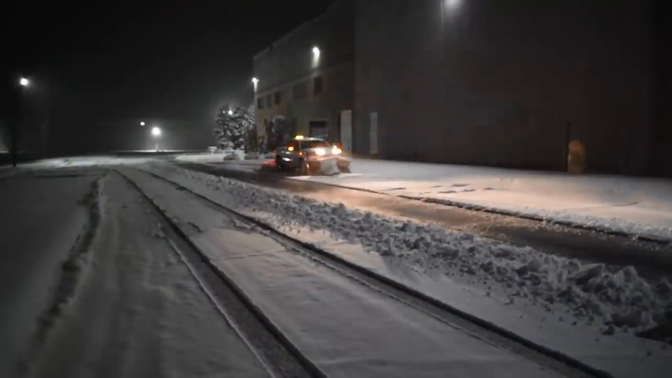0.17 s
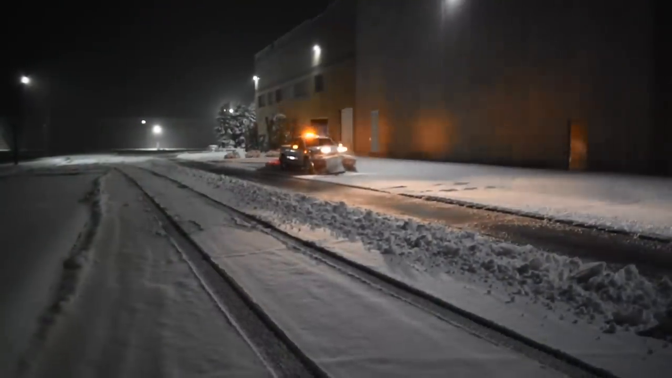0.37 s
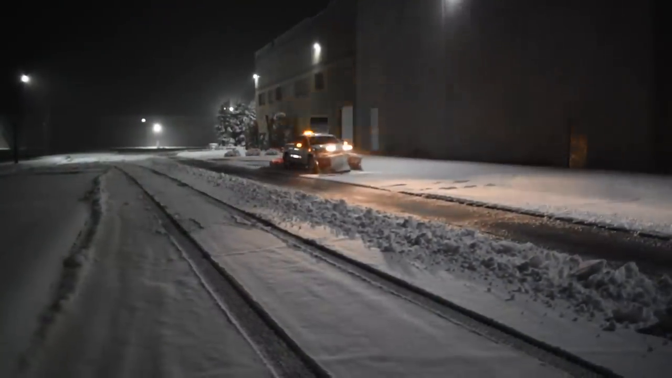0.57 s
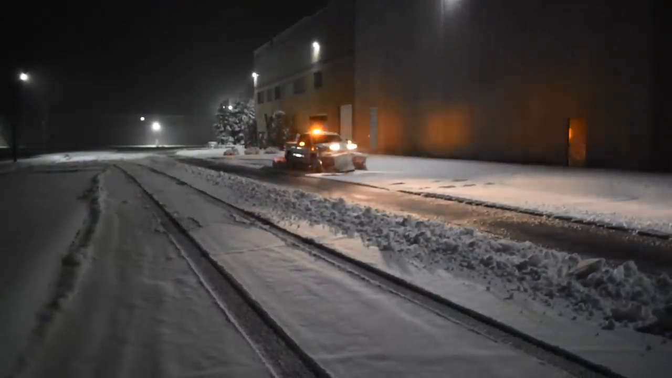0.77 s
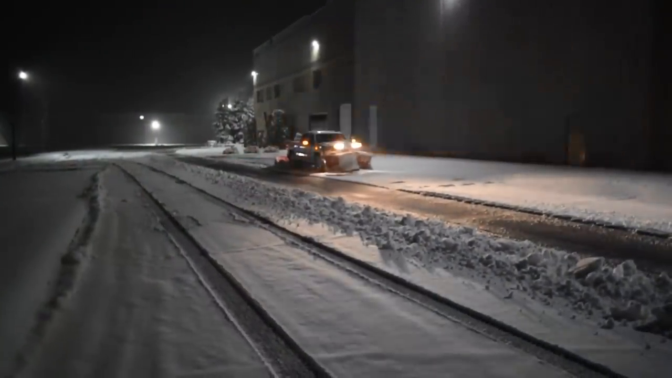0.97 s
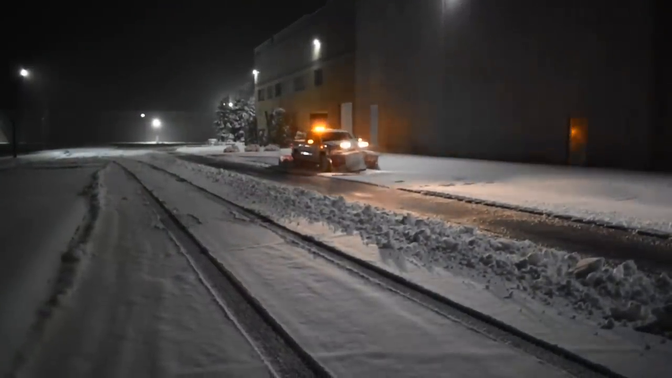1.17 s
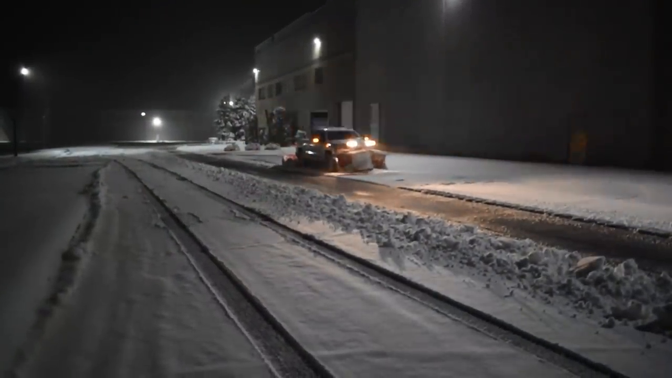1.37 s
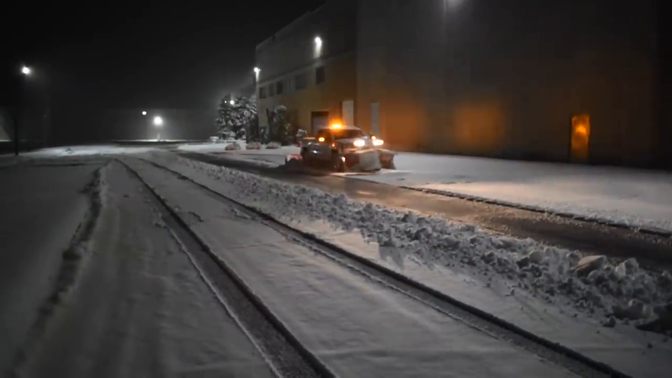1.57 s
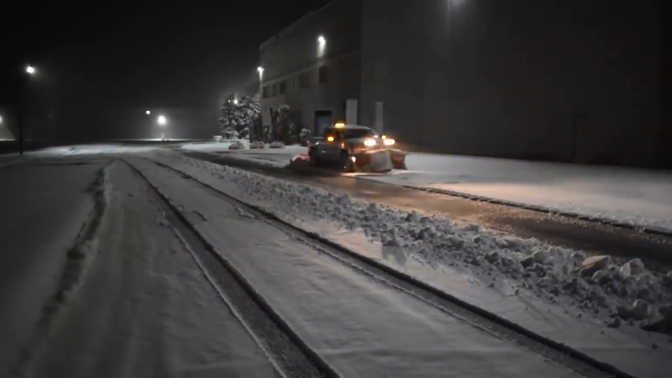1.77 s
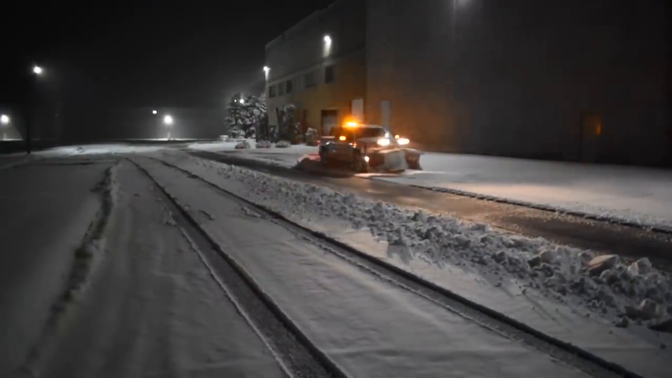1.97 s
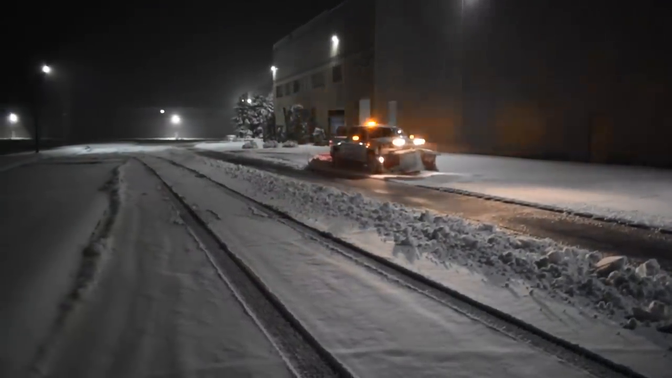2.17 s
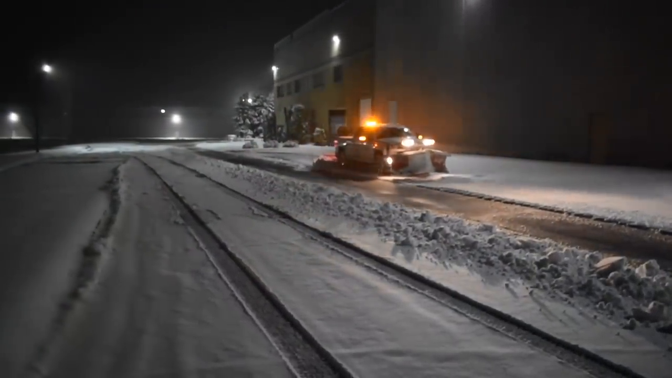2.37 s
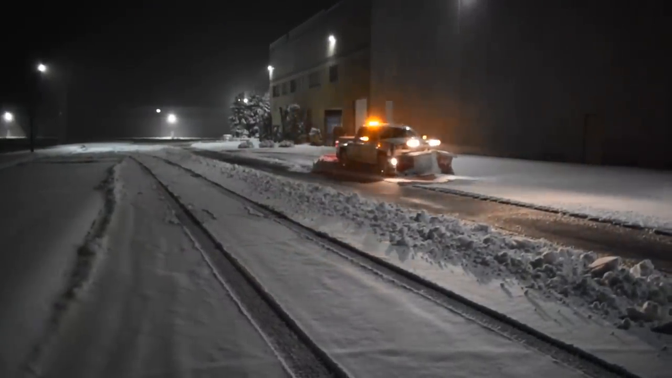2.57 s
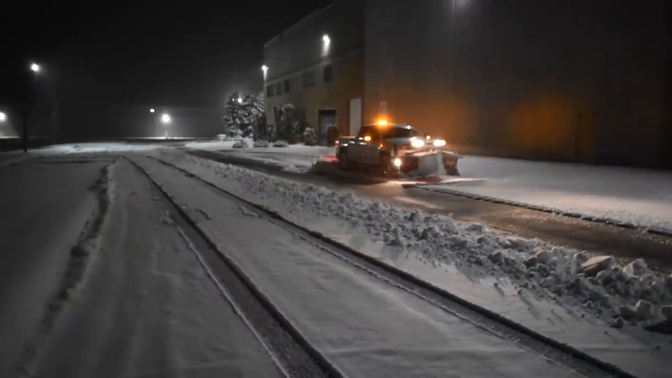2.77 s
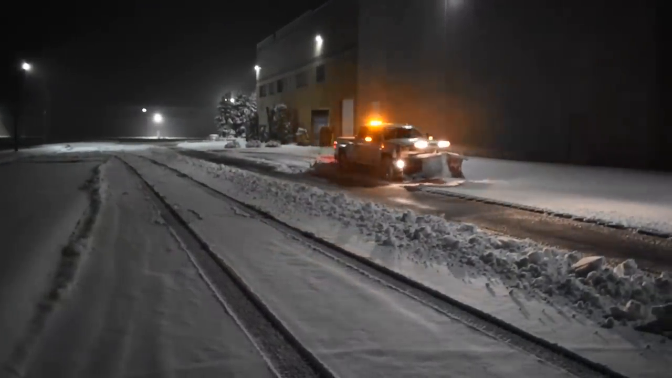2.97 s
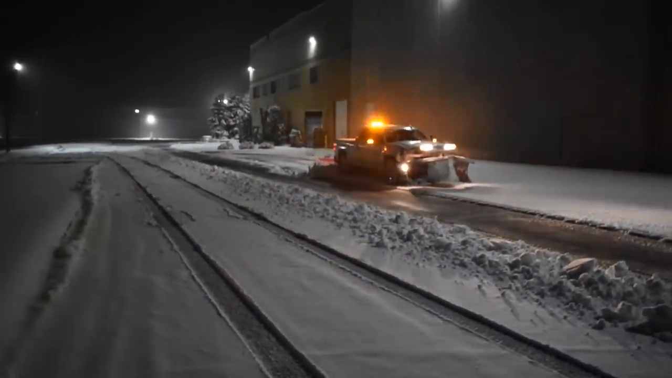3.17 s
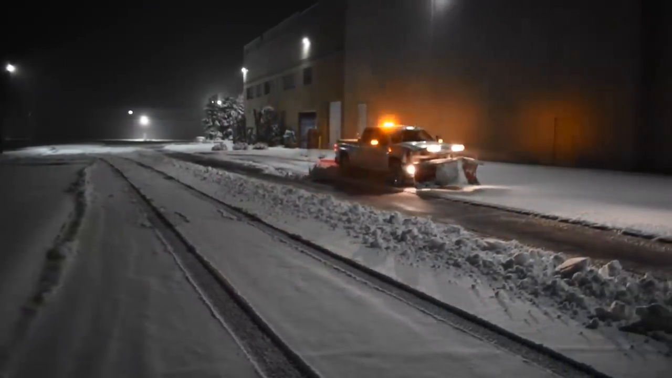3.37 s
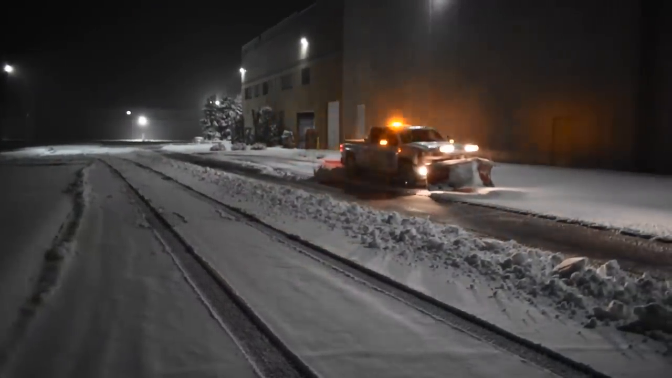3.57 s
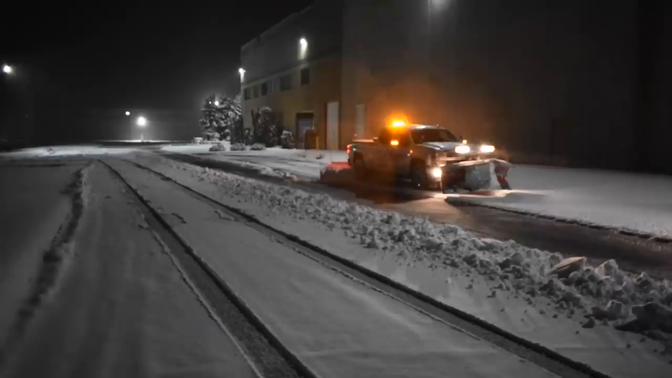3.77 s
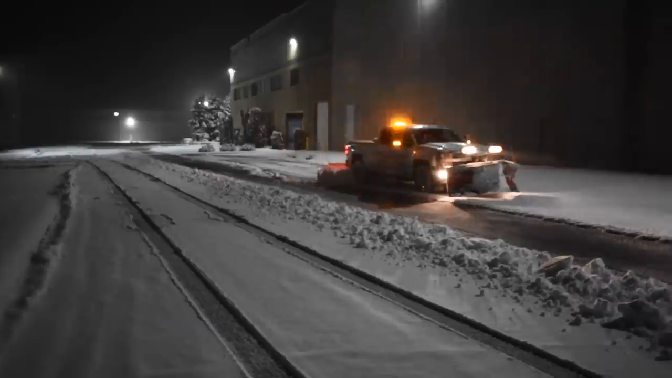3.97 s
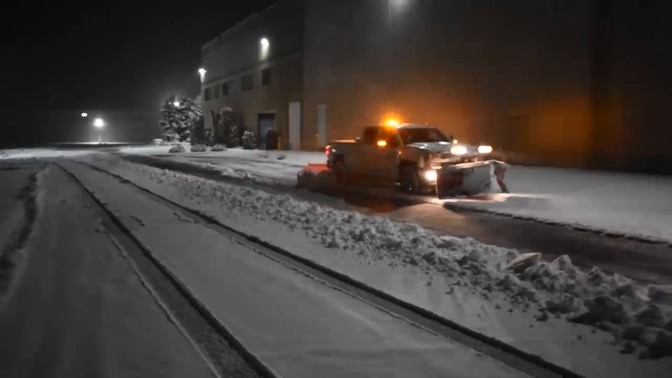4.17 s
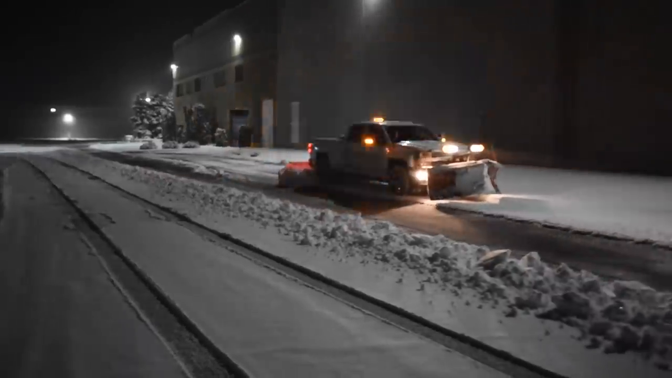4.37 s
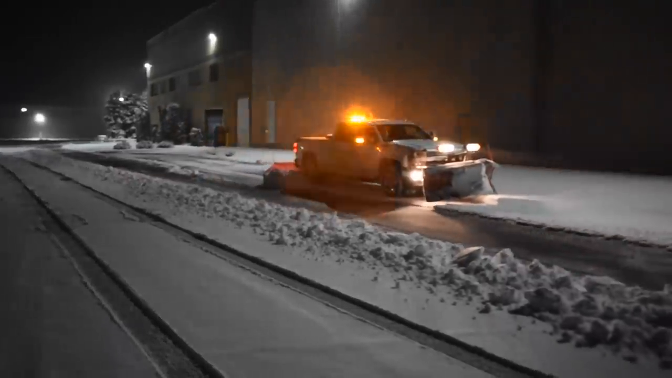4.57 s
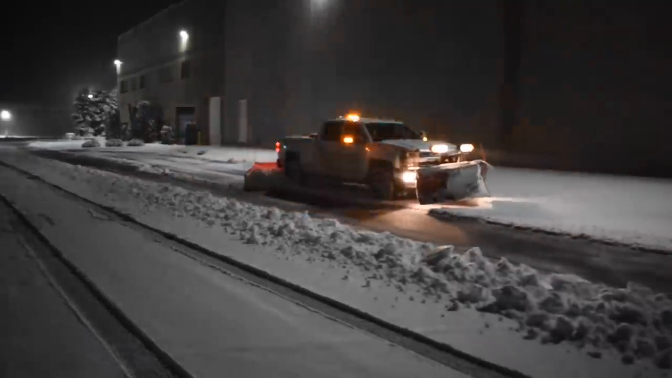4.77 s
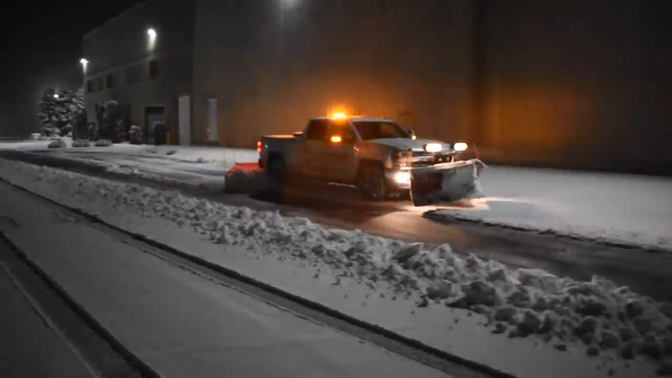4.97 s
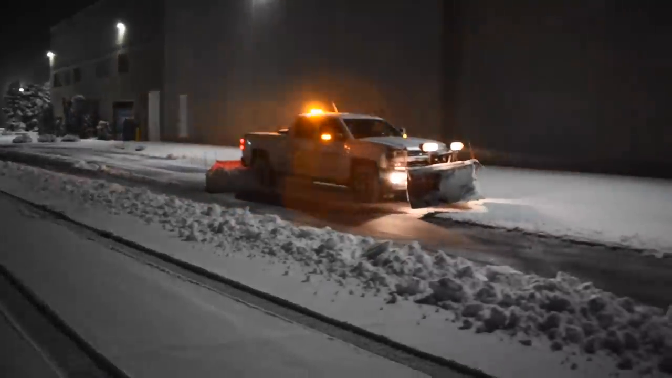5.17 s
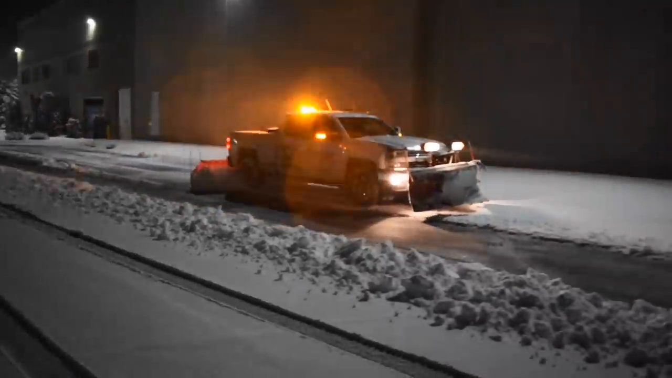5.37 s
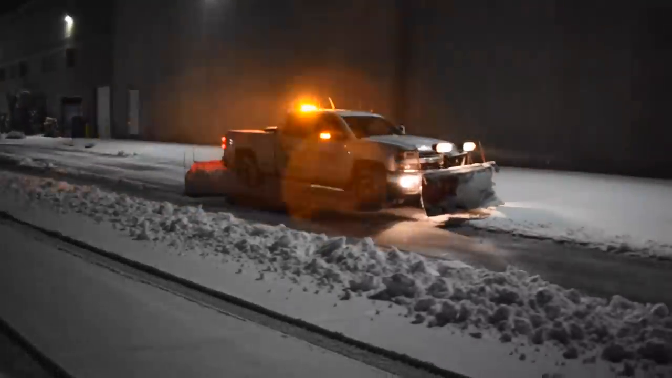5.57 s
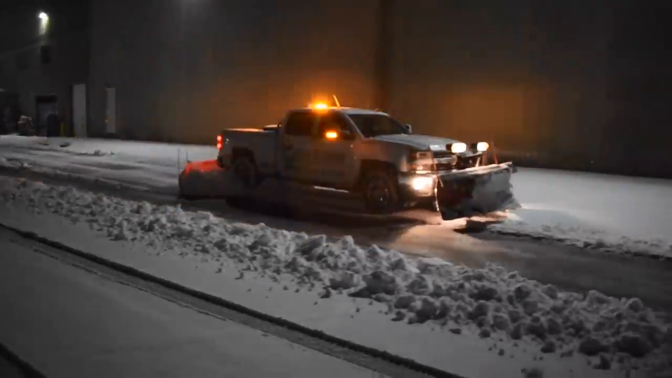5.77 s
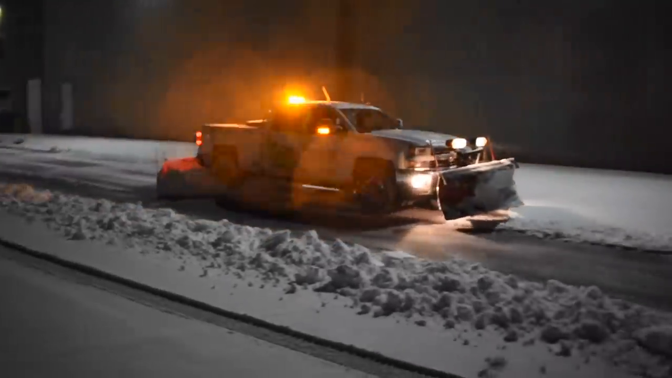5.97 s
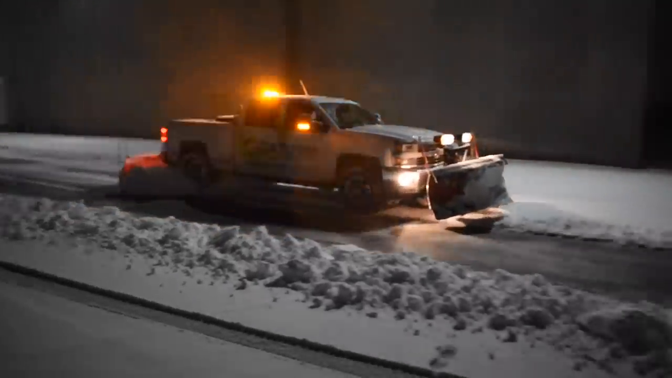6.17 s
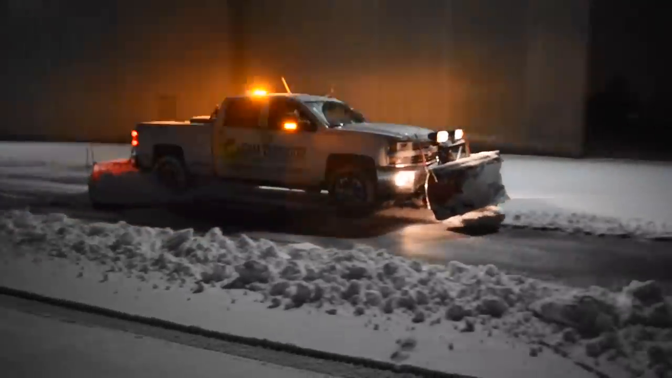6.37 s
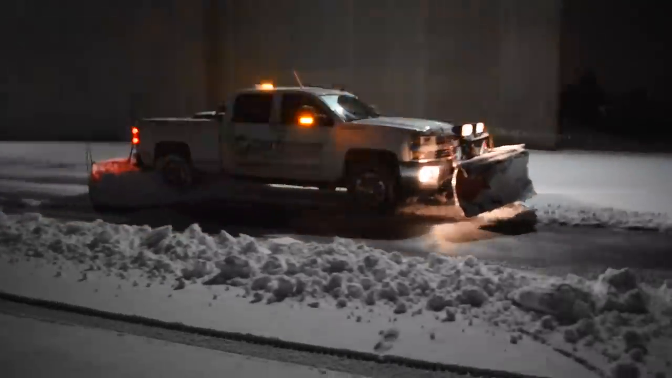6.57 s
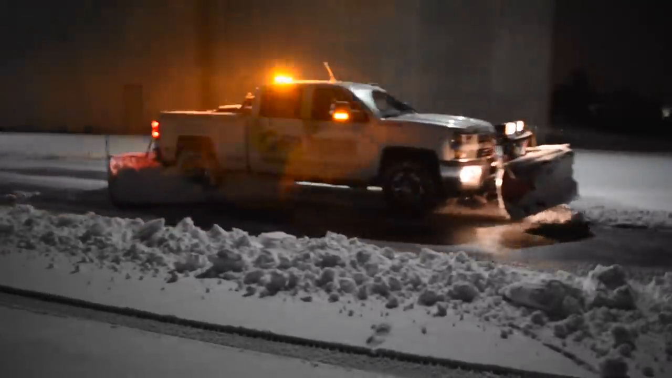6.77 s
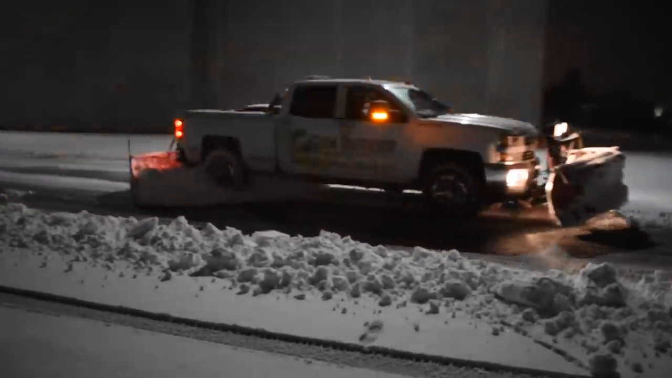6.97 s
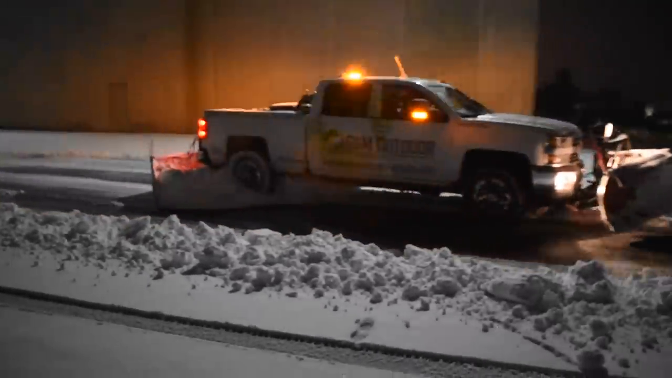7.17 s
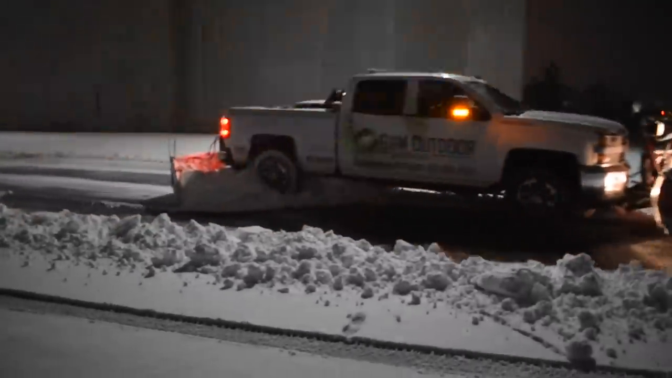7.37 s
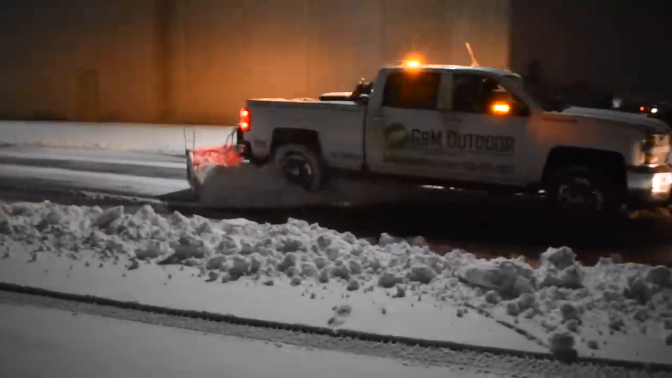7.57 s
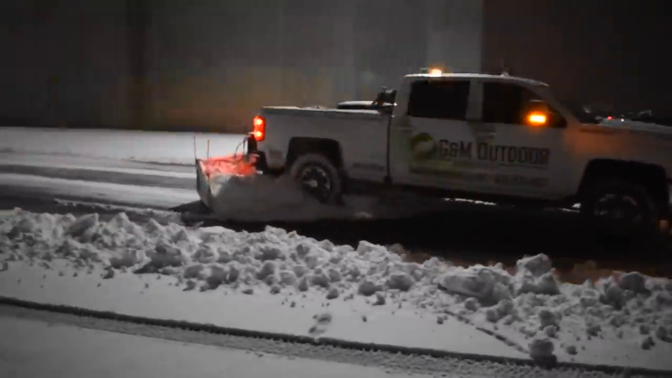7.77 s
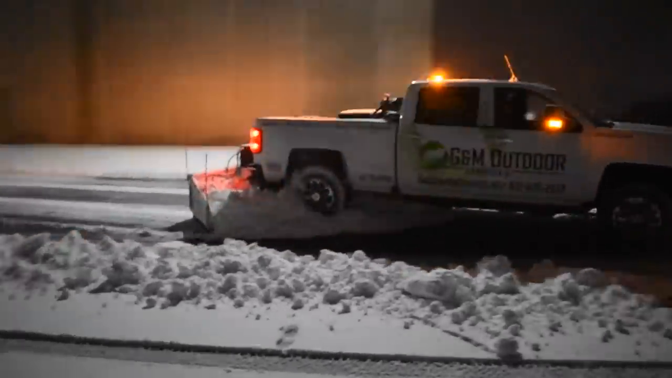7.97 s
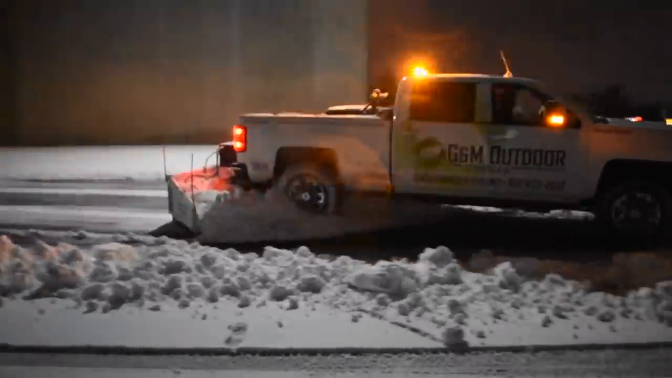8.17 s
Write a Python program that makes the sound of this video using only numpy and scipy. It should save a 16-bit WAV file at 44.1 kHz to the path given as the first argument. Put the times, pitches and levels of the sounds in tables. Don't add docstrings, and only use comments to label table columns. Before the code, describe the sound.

A pickup with a snow plow drones closer over wet asphalt, its blade roaring and hissing, then crunches loudly through packed snow as it passes.

```python
import sys
import numpy as np
from scipy import signal
from scipy.io import wavfile
from scipy.ndimage import uniform_filter1d

SR = 44100
rng = np.random.default_rng(int(sys.argv[2]) if len(sys.argv) > 2 else 0)


def convert_level_to_amplitude(level_db):
    exponent = np.asarray(level_db, float) / 20
    return 10 ** exponent


def wrap_up_sound(samples):
    columns = np.atleast_2d(samples).T
    tamed = np.clip(columns, -1, 1)
    steps = np.round(tamed * 32767).astype(np.int16)
    wavfile.write(sys.argv[1], SR, steps)


N = 362502

# [t/s, firing rate/Hz]
FIRING_RATE = [(0, 99.5), (.3, 101.6), (.8, 99.8), (1.5, 102.6), (1.75, 106.4), (2.25, 109.8), (3.2, 115),
               (4.18, 113.9), (4.45, 99.6), (4.65, 94), (4.75, 93), (4.95, 108.3), (5.1, 113),
               (5.35, 114.5), (6.05, 111.4), (6.8, 108.6), (7.35, 108.3), (8.22, 112.3)]
# [f/Hz, density/dB per Hz]
HISS_SPECTRUM = [(1200, -3), (1600, -3.5), (2200, -3.5), (3000, -6.5), (3800, -9), (4500, -8.5),
                 (5000, -11), (7000, -12.5), (8100, -10), (8800, -23), (10000, -19.5), (11500, -24),
                 (14000, -21.5), (16000, -21)]


def rms_one(x):
    return x / np.sqrt(np.mean(x ** 2) + 1e-20)


def in_time(rows):
    s, *columns = np.transpose(rows)
    return [np.interp(np.arange(N) / SR, s, c) for c in columns]


def at_hz(points, hz):
    f_hz, level_db = np.transpose(points)
    return np.interp(np.log(hz), np.log(f_hz), level_db)


def drift(rate_hz):
    r = np.exp(-2 * np.pi * rate_hz * 40 / SR)
    white = rng.standard_normal(N // 40 + 2002)
    slow = signal.lfilter([1], [1, -2 * r, r * r], white)[2000:]
    return np.interp(np.arange(N) / 40, np.arange(len(slow)), rms_one(slow))


def bell(centre_s, half_s):
    return np.exp(-((np.arange(N) / SR - centre_s) / half_s) ** 2)


def passing(abeam_s, level_db, steepness, afar_db):
    pass_s = 1.104
    nearness = 1 / (1 + ((np.arange(N) / SR - abeam_s) / pass_s) ** 2)
    return 10 * np.log10(convert_level_to_amplitude(level_db) ** 2 * nearness ** steepness + convert_level_to_amplitude(afar_db) ** 2)


def ring(clicks, hz, t60_s):
    r, w = convert_level_to_amplitude(-60 / (t60_s * SR)), 2 * np.pi * hz / SR
    return signal.lfilter([0, np.sin(w)], [1, -2 * r * np.cos(w), r * r], clicks + 1e-18)


def tone(turns, level_db):
    return np.sqrt(2) * convert_level_to_amplitude(level_db) * np.sin(2 * np.pi * (turns + rng.random()))


def noise(spectrum, patchy_db, count):
    edges_hz = np.geomspace(spectrum[0][0], spectrum[-1][0], count + 1)
    white, together, out = rng.standard_normal((2, N)), drift(11), 0
    for k, (low, high) in enumerate(zip(edges_hz, edges_hz[1:])):
        sos = signal.butter(2, [low, high], "band", fs=SR, output="sos")
        band = signal.sosfilt(sos, white[k % 2])
        flicker_db = patchy_db * (0.16 * together + 1.16 * drift(27))
        out = out + band * convert_level_to_amplitude(at_hz(spectrum, np.sqrt(low * high)) + flicker_db)
    return rms_one(out)


def grains(per_s, spread_db, pitches_hz, spectrum, cycles):
    sizes = convert_level_to_amplitude(spread_db * np.minimum(rng.exponential(1, N), 4)) * rng.choice([-1, 1], N)
    born = rng.random(N) < per_s * convert_level_to_amplitude(2.2 * drift(50)) / SR
    dealt = rng.integers(0, len(pitches_hz), N)
    out = 0
    for k, hz in enumerate(pitches_hz):
        clicks = sizes * born * (dealt == k)
        out = out + convert_level_to_amplitude(at_hz(spectrum, hz)) * np.sqrt(hz) * ring(clicks, hz, cycles / hz)
    return rms_one(out)


def engine():
    # [t/s, block as order 8/dB, tailpipe as order 5/dB]
    main_orders = [(0, -25.5, -31.5), (1.0, -26.5, -31), (1.5, -25, -24.5), (1.8, -33.5, -28),
                   (2.25, -29, -31.5), (3.0, -26.5, -35), (3.3, -30, -27), (3.75, -29, -25.5),
                   (4.15, -26.5, -27.5), (4.3, -24, -21.5), (4.5, -18.5, -31), (4.75, -12.5, -36),
                   (4.85, -21, -26), (4.96, -18.5, -20.5), (6.3, -18, -26.5), (7.05, -18.5, -19),
                   (7.55, -19.5, -17), (7.95, -14, -19.5)]
    # [order, far level/dB, lobe level/dB, lobe arrival/s, lobe half length/s]
    side_orders = [(3, -40, -30, 6, 1.1), (6, -36.5, -30, 7.4, 1.8), (9, -43, -30, 7.7, 3.9),
                   (10, -48, -28.5, 5.83, 1.3), (11, -48, -34, 3.1, 1.3), (12, -43, -28, 7.8, 1.3),
                   (13, -66, -29.5, 6.17, 1.4), (14, -63, -32.5, 0.84, 1.45), (12, -70, -27.5, 5.5, .5),
                   (13, -70, -34, 3.3, 1.8), (14, -70, -33.5, 3.54, 1.07), (18, -70, -39, 6.15, 0.35),
                   (16, -47, -37, 8, 1.1), (18, -58, -31, 7.13, 0.6), (20, -62, -33, 8.05, 0.45)]
    firing_db, exhaust_db = in_time(main_orders)
    firing_hz = in_time(FIRING_RATE)[0]
    turns = np.cumsum(firing_hz) / 8 / SR

    first_null_s, null_every_s = 0.65, 2.23
    echo = 0.97 * np.exp(2j * np.pi * (np.arange(N) / SR - first_null_s) / null_every_s)
    seventh_db = passing(abeam_s=8, level_db=-23, steepness=0.57, afar_db=-60)
    seventh_db = seventh_db + 20 * np.log10(np.abs(1 - echo) / 2)
    overtone_db = firing_db - 16.5 - (firing_hz - 100)

    out = tone(8 * turns, firing_db + 0.6 * drift(6))
    out += tone(5 * turns, exhaust_db + 0.8 * drift(4))
    out += tone(7 * turns + 0.2 * drift(0.6), seventh_db + 1.2 * drift(4))
    out += tone(16 * turns, overtone_db)
    for order, far_db, lobe_db, arrives_s, lasts_s in side_orders:
        slip = 0.13 * drift(0.6)
        level_db = 20 * np.log10(convert_level_to_amplitude(far_db) + convert_level_to_amplitude(lobe_db) * bell(arrives_s, lasts_s))
        out += tone(round(order) * turns + slip, level_db + 1.16 * drift(2.5))
    return out


def rolling():
    # [f/Hz, density/dB per Hz]
    rumble_spectrum = [(22, -7.5), (35, -1.5), (50, -5), (75, -4.5), (105, 1), (145, -6.5), (195, -4.5),
                       (230, -12), (300, -27), (340, -22)]
    # [f/Hz, density/dB per Hz]
    roar_spectrum = [(230, -2.5), (320, -5), (400, -3), (470, -1.5), (600, -1.5), (800, -3.5), (1100, -5),
                     (1600, -10.5), (1800, -16.5), (2400, -18.5), (4000, -28.5)]
    rumble_db = passing(abeam_s=8, level_db=-21.5, steepness=0.66, afar_db=-38)
    roar_db = passing(abeam_s=8.5, level_db=-23, steepness=0.73, afar_db=-34.5)
    hiss_db = passing(abeam_s=7.5, level_db=-26.54, steepness=1.72, afar_db=-49.54)
    roar_db = roar_db + 0.08 * (in_time(FIRING_RATE)[0] - 112)
    rumble = convert_level_to_amplitude(rumble_db) * noise(rumble_spectrum, patchy_db=0.36, count=11)
    roar = convert_level_to_amplitude(roar_db) * (noise(roar_spectrum, patchy_db=0.54, count=20) + blade())
    hiss = convert_level_to_amplitude(hiss_db) * noise(HISS_SPECTRUM, patchy_db=1.06, count=30)
    return rumble + roar + hiss


def blade():
    # [f/Hz, t60/s, level in the roar afar/dB, level when passing/dB]
    modes = [(369.4, 0.14, -11, -37.5), (436, 0.1, -18, -12.5), (468.4, 0.2, -13, -10.5),
             (553, 0.13, -35, -7), (634.6, 0.28, -19, -11.5), (762.6, 0.46, -13, -16.5),
             (7800, .012, -38, -38)]
    abeam, out = np.clip((np.arange(N) / SR - 4.5) / 4.34, 0, 1), 0
    for hz, t60_s, far_db, near_db in modes:
        shake = rms_one(ring(rng.standard_normal(N), hz, t60_s))
        out = out + convert_level_to_amplitude(far_db + abeam * (near_db - far_db) + 1.37 * drift(0.98)) * shake
    return out


def tread():
    # [t/s, f/Hz, level/dB]
    hum = [
        (4.8, 128, -45),
        (5.3, 132, -26),
        (5.9, 139, -38),
        (6.5, 147, -26),
        (7.1, 143, -30),
        (7.6, 141, -28),
        (8.0, 143, -25),
        (8.22, 142, -28),
    ]
    hz, level_db = in_time(hum)
    turns = np.cumsum(hz * (1 + 0.00705 * drift(3.74))) / SR
    return tone(turns, level_db + 1.8 * drift(8.9))


def crunch():
    # [t/s, length/s, level/dB, ice relative to level/dB]
    ridges = [(0.967, 0.039, -37, -3), (1.04, .07, -37.5, -8), (1.12, 0.3, -41.5, -6),
              (1.855, 0.05, -52, 6), (3.315, 0.069, -42, -7), (4.285, .03, -41, -6),
              (4.335, 0.053, -38.5, -1.5), (5.025, 0.039, -40, -20), (5.553, 0.055, -30.5, -10),
              (5.62, .07, -36, -4), (5.71, 0.076, -32, -9), (5.86, 0.063, -33.5, -0.5),
              (5.975, 0.078, -35, -1), (6.06, .09, -20, -11), (6.14, .08, -17.5, -18),
              (6.221, 0.049, -15, -12), (6.275, 0.11, -17.5, -9), (6.395, .07, -25.5, -9),
              (6.703, .04, -29.5, -7), (6.77, 0.11, -24.5, -4), (6.9, .08, -24, -9),
              (6.978, 0.11, -21, -6.5), (7.15, .03, -31, -8), (7.405, .06, -43, -7), (7.47, .06, -21.5, -5),
              (7.523, 0.065, -19.5, -1.5), (7.6, 0.076, -20.5, -6.5), (7.73, .04, -29.5, -4)]
    # [f/Hz, level/dB]
    lump_spectrum = [(600, -9), (800, 0.5), (1200, 1.5), (2200, 2), (3200, 0), (4500, -21)]
    # [abeam t/s, level/dB, steepness, level from afar/dB]
    rear_scraper = (8.5, -42.5, 1.6, -79)
    rise_s, fall_db_per_s = 0.0079, 250
    t, gains = np.arange(N) / SR, np.zeros((3, N))
    for start_s, length_s, level_db, ice_db in ridges:
        rise = np.clip((t - start_s) / rise_s + 1, 0, 1)
        fall = convert_level_to_amplitude(-fall_db_per_s * np.clip(t - start_s - length_s, 0, 1))
        mix_db = np.array([[-1.5], [ice_db - 6.5], [0.6 * ice_db - 22]])
        gains = np.maximum(gains, convert_level_to_amplitude(level_db + mix_db) * rise * fall)
    lumps = grains(1900, 3.3, np.geomspace(600, 4500, 14), lump_spectrum, cycles=11)
    ice = grains(3500, 3.3, np.geomspace(4200, 8200, 8), HISS_SPECTRUM, cycles=22)
    spray = grains(3000, 3.6, np.geomspace(9000, 15500, 8), HISS_SPECTRUM, cycles=18)
    return gains[0] * lumps + gains[1] * ice + (gains[2] + convert_level_to_amplitude(passing(*rear_scraper))) * spray


def cracks():
    # [t/s, peak/dB, f/Hz]
    lumps = [(0.985, -28, 1510), (1.068, -28, 1580), (1.8634, -29, 1550), (1.9048, -25, 1590),
             (3.9937, -31, 4300), (4.363, -22.5, 2480), (4.881, -28, 1540), (5.557, -22, 2880),
             (5.997, -18, 1500), (6.059, -15, 1520), (6.1365, -13, 1520), (6.1694, -18, 2430),
             (6.26, -7, 1480), (6.267, -7.5, 2430), (6.2994, -11, 2320), (6.331, -6, 2260),
             (6.372, -12, 2450), (6.772, -18, 1520), (6.7952, -16, 2550), (6.8334, -11, 1600),
             (6.874, -12.5, 3030), (6.999, -12, 1580), (7.0574, -12, 1500), (7.104, -12, 1980),
             (7.4734, -14, 1940), (7.576, -7, 2000), (7.626, -9, 1600), (7.6504, -11, 1470),
             (7.6914, -8, 2060), (7.8997, -22, 1490)]
    # [t/s, peak/dB, f/Hz]
    stone = (6.347, 0.5, 500)
    out, tail_s = np.zeros(N + 1024), np.arange(1024) / SR
    sos = signal.butter(3, [1600, 4800], "band", fs=SR, output="sos")
    for s, level_db, hz in [stone, *lumps]:
        body = np.sin(2 * np.pi * hz * tail_s) * np.exp(-tail_s / 0.0018)
        splinters = signal.sosfilt(sos, rng.standard_normal(1024))
        puff = (hz > 1000) * splinters * np.exp(-tail_s / 0.003)
        rise = np.minimum(tail_s * hz / 0.9, 1)
        i = round(s * SR)
        out[i:i + 1024] += convert_level_to_amplitude(level_db + 1) * (body + puff) * rise
    return out[:N]


def ticks():
    # [t/s, peak/dB]
    specks = [(4.3335, -40), (4.348, -35), (4.7192, -32), (4.8816, -29), (5.9189, -30), (6.2597, -26),
              (6.3101, -23), (6.3719, -23), (6.7121, -23), (6.7526, -21), (6.7953, -19), (6.8264, -21),
              (6.8758, -13), (6.9451, -22), (7.1048, -14), (7.454, -18), (7.4674, -19), (7.5413, -13.5),
              (7.648, -16), (7.6869, -13), (7.7214, -19), (7.899, -20), (8.0716, -23), (8.1645, -15.5)]
    out, tail_s = np.zeros(N + 256), np.arange(256) / SR
    for s, level_db in specks:
        i = round(s * SR)
        out[i:i + 256] += convert_level_to_amplitude(level_db + 4) * rng.standard_normal(256) * np.exp(-tail_s / 0.001)
    sos = signal.butter(1, [2500, 8500], "band", fs=SR, output="sos")
    return signal.sosfilt(sos, out[:N])


def squeaks():
    # [start t/s, end t/s, f/Hz, level/dB]
    bursts = [
        (.33, .37, 14300, -64),
        (2.55, 2.6, 14300, -62),
        (3.89, 3.96, 14090, -56),
        (4.52, 4.61, 14280, -56),
        (4.62, 4.78, 14370, -54),
        (5.33, 5.36, 14230, -57),
        (5.45, 5.49, 14300, -57),
        (6.018, 6.075, 14200, -47),
    ]
    t, out, flutter = np.arange(N) / SR, 0, convert_level_to_amplitude(2.5 * drift(30))
    for start_s, end_s, hz, level_db in bursts:
        whistle = rms_one(ring(ring(rng.standard_normal(N), hz, 0.009), hz, 0.009))
        whistle = flutter * whistle / np.sqrt(uniform_filter1d(whistle ** 2, size=400) + 0.1)
        fade = np.clip(np.minimum(t - start_s, end_s - t) / 0.012, 0, 1)
        out = out + convert_level_to_amplitude(level_db) * whistle * fade
    return out


def wind():
    # [t/s, peak/dB, half length/s]
    gust_table = [(0.072, -20.5, .1), (.36, -25, 0.13), (.77, -30, 0.11), (1.46, -23, 0.18),
                  (2.06, -25, 0.13), (2.4, -27, .06), (2.7, -27, .2), (3.28, -28.5, .2), (4.137, -15, 0.19),
                  (4.7, -19, .15), (5.053, -22, .08), (5.23, -24, .05), (5.95, -22, .25), (6.131, -19, .05),
                  (6.43, -7, 0.065), (6.615, -13, .05), (6.87, -15, 0.12), (7.267, -10, 0.041),
                  (7.37, -12, 0.072), (7.798, -14, 0.19), (8.1, -5, .06)]
    calm_db = -33.5
    sos = signal.butter(2, [6.5, 14], "band", fs=SR, output="sos")
    lumps = rms_one(signal.sosfilt(sos, rng.standard_normal(N + SR))[SR:])
    spread = np.sqrt(uniform_filter1d(lumps ** 2, size=SR // 6) + 0.05)
    gusts = convert_level_to_amplitude(calm_db) + sum(convert_level_to_amplitude(peak_db) * bell(s, half_s) for s, peak_db, half_s in gust_table)
    return convert_level_to_amplitude(-1.5) * gusts * lumps / spread


def scene():
    snow = crunch() + cracks() + ticks()
    delayed = np.pad(snow, (round(0.035 * SR), 0))[:N]
    echo = convert_level_to_amplitude(-8) * signal.lfilter([0.4], [1, -0.6], delayed)
    return (engine() + rolling() + tread() + snow + echo + squeaks() + wind())[None]


def low_pass(x):
    return signal.sosfilt(signal.butter(12, 15980, fs=SR, output="sos"), x)


def record(dry):
    # [f/Hz, width/Hz, depth 0-1]
    notches = [
        (6620, 440, 0.38),
        (10500, 570, 0.7),
    ]
    for hz, width_hz, depth in notches:
        dry = dry - depth * signal.lfilter(*signal.iirpeak(hz, hz / width_hz, fs=SR), dry)
    rounded = dry / (1 + (dry / 1.02) ** 6) ** (1 / 6)
    sos = signal.ellip(10, 0.5, 70, 15740, fs=SR, output="sos")
    mix = signal.sosfilt(sos, rounded)
    return low_pass(mix)


dry = scene()
out = record(dry)
wrap_up_sound(out)
```